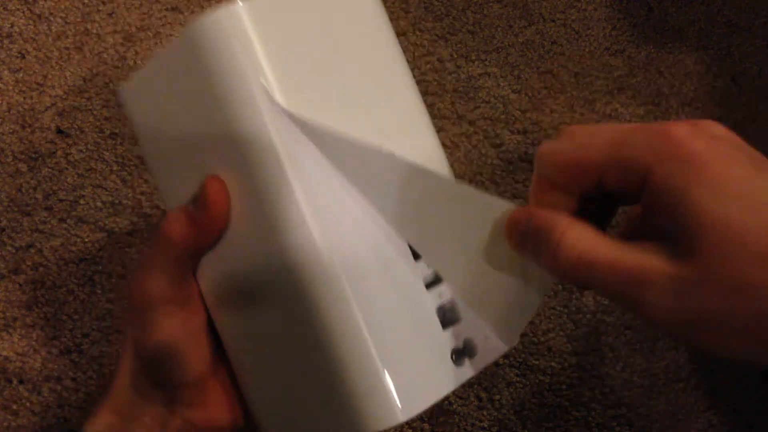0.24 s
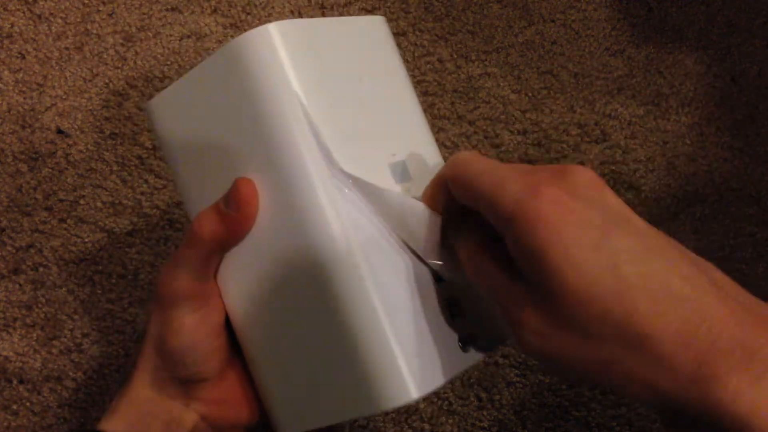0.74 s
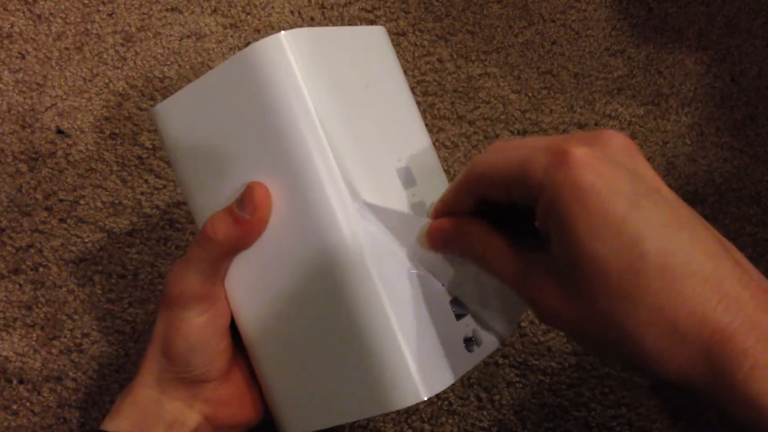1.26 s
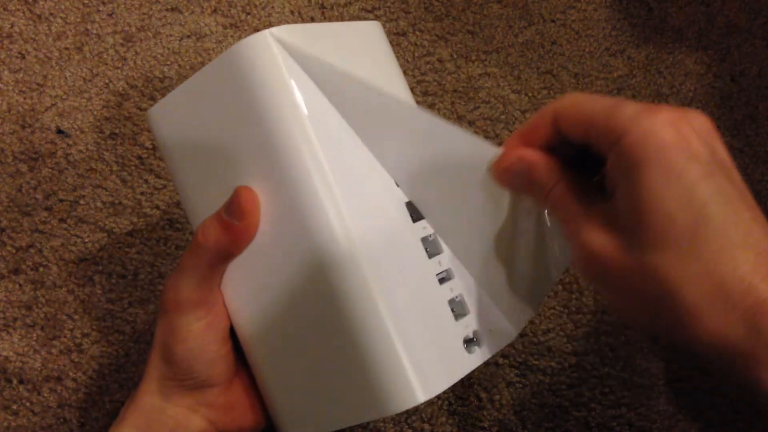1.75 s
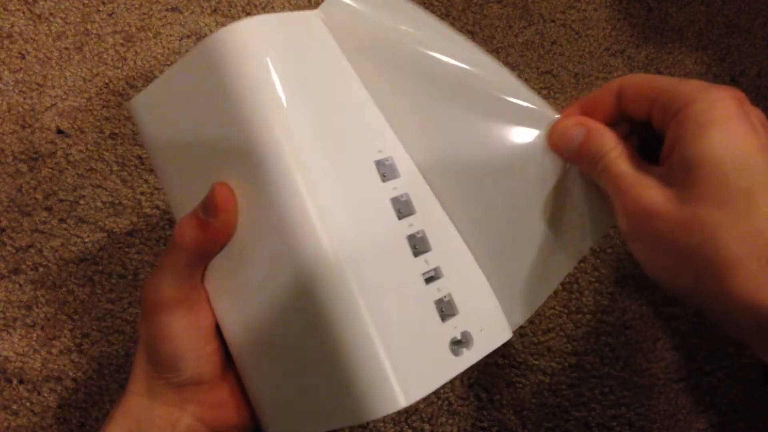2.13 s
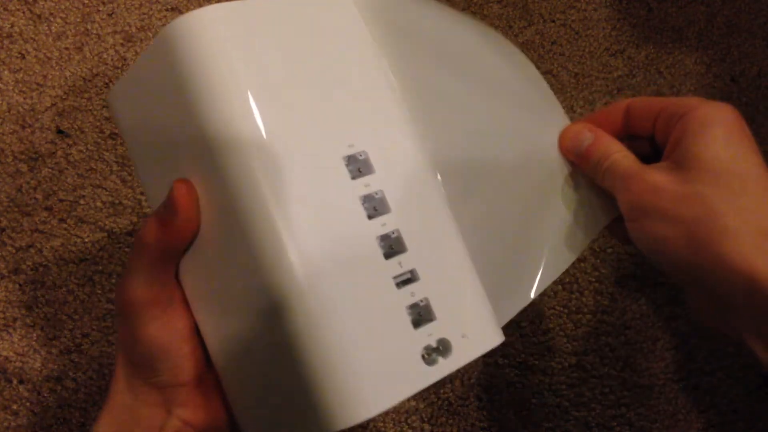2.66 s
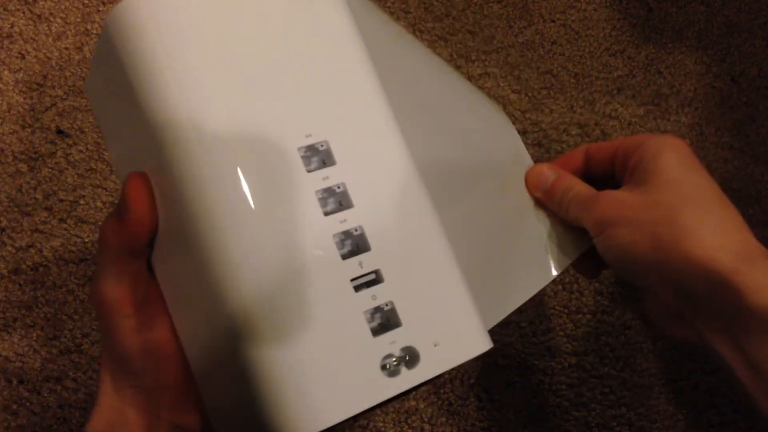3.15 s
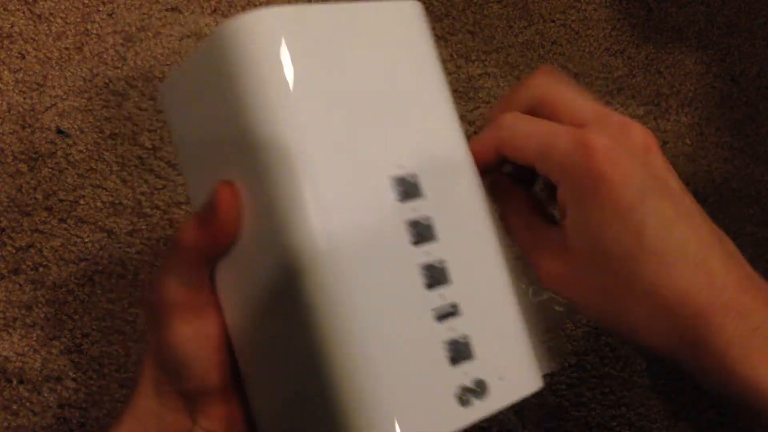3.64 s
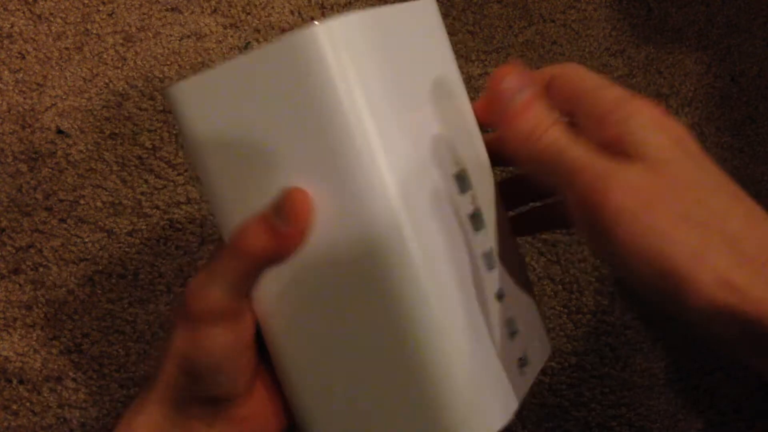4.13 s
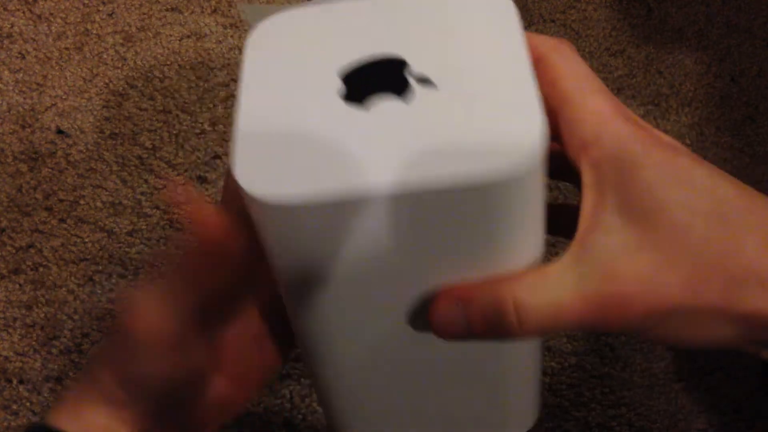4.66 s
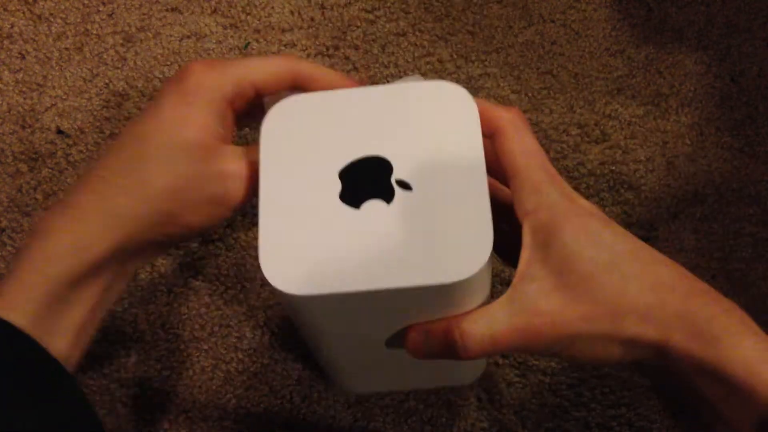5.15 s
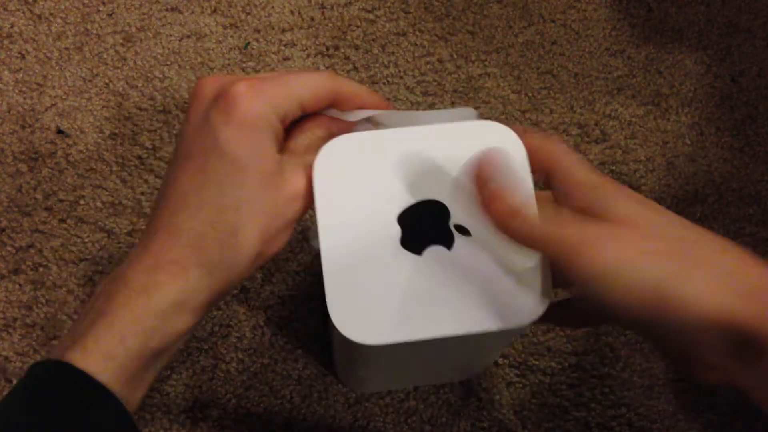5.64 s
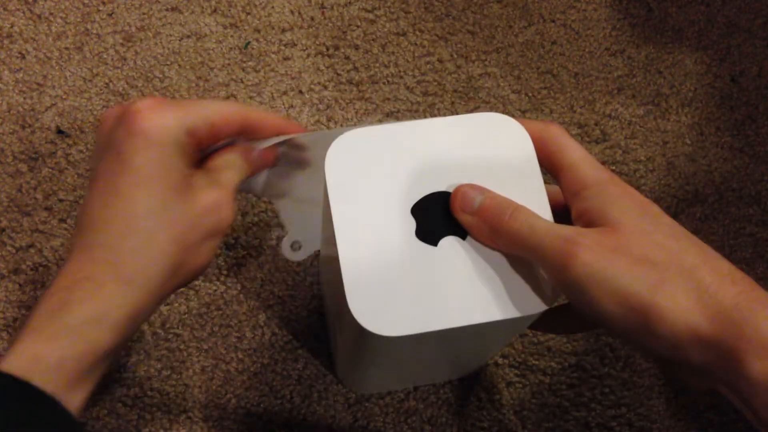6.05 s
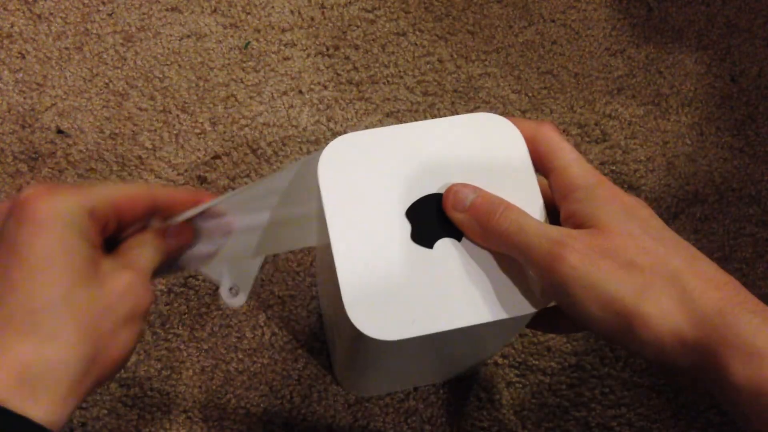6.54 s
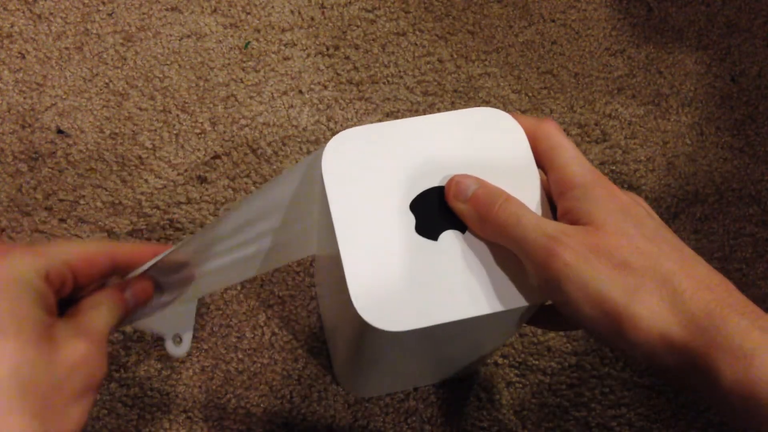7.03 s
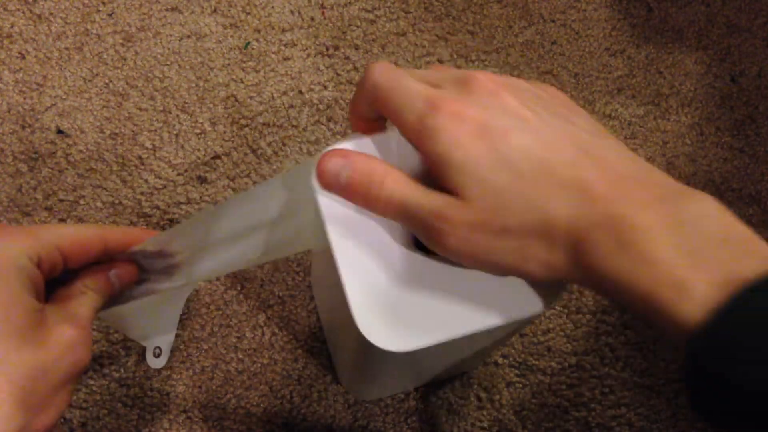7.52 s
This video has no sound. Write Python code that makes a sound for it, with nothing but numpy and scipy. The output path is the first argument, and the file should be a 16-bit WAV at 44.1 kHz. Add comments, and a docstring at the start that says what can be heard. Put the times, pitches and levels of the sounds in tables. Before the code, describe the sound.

Close-up crackling of stiff protective film pulling off a plastic shell in a carpeted room, sparse loud cracks over steady hiss and low rumble.

```python
"""Protective plastic film is peeled by hand off the hollow casing of a small device in a carpeted room.
The sheet cracks as it buckles, crinkles in runs of ticks and pops like a drum skin where it is taut.
Midway it rubs and scrapes over the casing; later the glue lets go in a fine hiss of tiny ticks.
The casing rings along, fingers tick and bump, and behind it all lie room echo, hiss, rumble and hum."""
import sys
import numpy as np
from scipy import signal
from scipy.fft import rfft, irfft, next_fast_len
from scipy.io import wavfile
from scipy.ndimage import map_coordinates

SR = 44100
rng = np.random.default_rng(int(sys.argv[2]) if len(sys.argv) > 2 else 0)


def transcribe(signal):
    """Save signal, clipped to [-1, 1], as a 16-bit WAV file at the path in sys.argv[1]."""
    frames = np.atleast_2d(signal).T
    limited = np.clip(frames, -1, 1)
    pcm = np.round(limited * 32767).astype(np.int16)
    wavfile.write(sys.argv[1], SR, pcm)


N = 343315
TIME = np.arange(N) / SR


def amp(db):
    """Turn decibels into a plain multiplier."""
    return 10 ** (np.asarray(db) / 20)


def unit(x):
    """Scale x to rms 1."""
    return x / np.sqrt(np.mean(x ** 2) + 1e-20)


def unit_energy(x):
    """Scale x to energy 1."""
    return x / np.sqrt(np.sum(x ** 2) + 1e-20)


def along(points, hz):
    """Read a curve of (f/Hz, value) points, spaced as the ear hears pitch (log axis)."""
    f, v = np.transpose(points)
    return np.interp(np.log(hz + 1), np.log(f + 1), v)


def level(rows):
    """Multiplier per sample of a (t/s, level/dB) curve, silent outside it."""
    s, db = np.transpose(rows)
    inside = (TIME >= s[0]) * (TIME <= s[-1])
    return amp(np.interp(TIME, s, db)) * inside


def add(track, s, sound):
    """Mix a sound into the track at time s."""
    part = track[max(round(s * SR), 0):][:len(sound)]
    part += sound[:len(part)]


def filtered(x, gain):
    """Multiply each frequency of x by its own gain."""
    m = next_fast_len(N + SR // 4)  # spare room at the end for ringing
    hz = np.fft.rfftfreq(m, 1 / SR)
    return irfft(rfft(x, m) * gain(hz), m)[:N]


def coloured(x, spectrum):
    """Shape x by a (f/Hz, level/dB) curve, then scale it to rms 1."""
    return unit(filtered(x, lambda hz: amp(along(spectrum, hz))))


def wobble(size, rate):
    """A smooth random curve with that many random points (knots) a second."""
    knots = rng.standard_normal(size // 20)
    return map_coordinates(knots, [np.arange(size) * min(rate, 2000) / SR])


def grains(size, rate, spread_db):
    """Random ticks of uneven strength, about rate a second, at rms 1."""
    unevenness = np.clip(rng.standard_normal(size), -2, 2)
    strength = amp(spread_db * unevenness) * rng.choice([-1, 1], size)
    return unit(strength * (rng.random(size) < rate / SR))


def moves(rows, attack_s, release_s, swell_db_per_s=0):
    """Loudness of (t/s, length/s, level/dB) hand movements: each sets in, holds or swells, and dies away."""
    gain = np.zeros(N)
    for s, length, db in rows:
        t = np.maximum(TIME - s, 0)
        swell_db = swell_db_per_s * np.minimum(t - length, 0)
        fade_db = 60 * np.maximum(t - length, 0) / release_s
        shape_db = np.maximum(swell_db - fade_db, -120)
        gain += amp(db + shape_db) * (1 - np.exp(-t / attack_s))
    return gain


def facet(push, centre_hz, rise_db, fall_db, ring_db, size=8192):
    """A pushed patch of film sounds best around one frequency; energy 1."""
    hz = np.fft.rfftfreq(size, 1 / SR) + 1
    octave = np.log2(hz / centre_hz)
    slopes_db = rise_db * np.minimum(octave, 0) - fall_db * np.maximum(octave, 0)
    db = slopes_db + ring_db * np.exp(-(octave / 0.53) ** 2)
    flip_hz = 13800  # a flip takes a finite time, which dulls the highest treble
    gain = amp(db) / np.sqrt(1 + (hz / flip_hz) ** 20)
    # folding the cepstrum (spectrum of the log gain) makes the patch answer only after the push
    cepstrum = irfft(np.log(np.maximum(gain, 1e-6)))
    cepstrum[1:size // 2] *= 2
    cepstrum[size // 2 + 1:] = 0
    return unit_energy(irfft(rfft(push, size) * np.exp(rfft(cepstrum))))


RISE_DB_PER_OCTAVE = 5.5  # snaps and crinkles weaken this fast below their centre

# single buckles of the film: t/s, level/dB (rms over 10 ms), centre f/Hz, fall above it/dB per octave,
# peak or dip at the centre/dB, share of the first crack in the energy/0-1
BUCKLES = [(0.1973, -45, 3450, 10.5, 0.5, .1), (0.5715, -37, 3070, 8.5, 2.5, 0.63),
           (0.5987, -48, 5170, 17, -2, 0.8), (0.7182, -39, 4470, 8.5, 0.5, 0.3),
           (0.77, -51.5, 2170, 2.5, 9, 0.67), (0.8517, -45, 1940, 5.5, 5, 0.6),
           (1.1105, -49, 5100, 9.5, 1.5, 0.13), (1.17, -62, 1900, 16, -3, .3),
           (1.243, -51.5, 2290, 13.5, -8.5, 0.6), (1.41, -25, 6600, 15, -5, 0.92),
           (1.5156, -45.5, 1850, 9.5, 4, 0.79), (1.9257, -39, 3700, 11, -5.5, 0.58),
           (2.136, -38, 4620, 24, -7.5, 0.5), (2.5173, -22, 5800, 5.5, -1, 0.82),
           (2.8207, -21, 8900, 6.5, -2, 0.76), (2.8738, -44.5, 3700, 8.5, -3, 0.34),
           (3.4117, -48.5, 3630, 13, 8, 0.3), (3.4295, -38, 4970, 16, -5.5, .05),
           (3.464, -42, 5800, 24, -1, .9), (3.977, -41, 1550, 8, 6.5, 0.93),
           (4.6531, -41.5, 6000, 14, 4, 0.4), (4.8947, -28.5, 5470, 15, 5.5, 0.14),
           (4.9172, -36, 5200, 20, 0, 0.35), (4.9504, -41.5, 4810, 24, -4, 0.14),
           (5.0788, -42, 4230, 16, 8, 0.97), (5.373, -59.5, 5000, 20, -4, 0.1),
           (5.4477, -28.5, 12300, 21, 1.5, 0.97), (5.4624, -33.5, 4170, 0.5, 5, 0.13),
           (5.5634, -30, 5240, 2.5, 7.5, 0.53), (5.6048, -37, 6900, 7, 4, 0),
           (5.6364, -39.5, 3960, 12, 6.5, 0), (5.6705, -36.5, 9350, 14, -3.5, 0.4),
           (5.7393, -49.5, 3750, 12, 3, 1), (5.7826, -53.5, 4840, 15, -6, .3),
           (5.9026, -30, 6600, 0, 1, 0.34), (5.9291, -34, 5940, 1, 4, 0.57),
           (5.9437, -35, 3500, 4, 7, 0.04), (6.103, -56, 3500, 1, 6, 0.6),
           (6.2033, -20.5, 8900, 5, 3.5, 0.84), (6.333, -55, 3620, 3, 7, .27),
           (6.4007, -24, 7360, 8, 10, 0.45), (6.4484, -39, 3150, 8.5, -10, 0.87),
           (6.482, -32.5, 9050, 10, 6, 0.3), (6.5241, -40, 7000, -6, 10, 0.45),
           (6.619, -51, 8800, -9, 6, 0.2), (6.812, -54.5, 4000, 15, 3.5, 0.5),
           (7.2347, -39.5, 3630, 9.5, 2.5, 0.52), (7.2959, -53, 6430, 12, 1, 0.87),
           (7.489, -56.5, 4120, 13, 18, 0.5)]


def snaps():
    """A buckle flips with one crack, rebounds within a few milliseconds and leaves the sheet fluttering."""
    track, t = np.zeros(N), np.arange(2048) / SR
    for s, db, centre_hz, fall_db, ring_db, share in BUCKLES:
        share = np.clip(share, 0, 1)
        # both fade by 60 dB: the rebound in 3.5 ms, the flutter in 33 ms
        rebound = unit_energy(rng.standard_normal(len(t)) * amp(-60 * t / .0035) * (t > .0001))
        crack = unit_energy((t == 0) + .7 * rebound)
        flutter = unit_energy(rng.standard_normal(len(t)) * amp(-60 * t / 0.033) * (t > .0001))
        push = np.sqrt(share) * crack + np.sqrt(1 - share) * flutter
        snap = facet(push, centre_hz, RISE_DB_PER_OCTAVE, fall_db, ring_db)
        add(track, s, amp(db) * np.sqrt(SR / 100) * snap)
    return track


def disperse(x):
    """Bending waves run faster the higher they are, so a crack's low part arrives a little later."""
    radian_hz = 40  # the wave lags by one radian here
    return filtered(x, lambda hz: np.exp(-1j * np.sqrt(hz / radian_hz)))


# runs of tiny buckles: t/s, length/s, level/dB (before a 1 dB trim), centre f/Hz,
# fall above it/dB per octave, peak or dip at the centre/dB
CREASES = [(0.577, 0.005, -40, 2980, 15, -7), (0.702, 0.04, -47.5, 6960, 8, -8),
           (0.84, 0.03, -53, 1900, 5.5, -6), (0.881, 0.013, -30, 5800, 21.5, -1),
           (0.904, 0.037, -43.5, 3800, 15, -7.5), (1.082, 0.011, -52.5, 2100, 0.5, 13),
           (3.423, .02, -50, 5430, 12, 5), (3.657, 0.02, -35, 5020, 29.5, -5.5),
           (3.689, 0.026, -39, 4000, 21, -1), (3.999, 0.0413, -45, 4900, 24, 1),
           (4.046, 0.022, -40.5, 4520, 20, 1.5), (4.654, .055, -52.5, 4730, 13.5, -7.5),
           (5.005, .009, -50, 2100, 4, 3), (5.022, 0.018, -42, 4960, 18.5, -0.5),
           (5.058, .024, -41, 4300, 18.5, -3.5), (5.26, .022, -51.5, 4400, 7, -1),
           (5.289, 0.013, -37.5, 4700, 13, 3), (5.31, 0.0076, -47.5, 4330, 21, 2),
           (5.941, .037, -47, 4400, 13, -3), (6.408, 0.038, -39, 7400, 9, 18),
           (6.489, 0.035, -48.5, 9710, 15, 8), (7.49, 0.022, -57.5, 3650, 7, -1),
           (7.588, 0.013, -60, 1800, 5.5, -1)]


def crinkles():
    """A crease runs through the film as a short avalanche of ticks, which come in clumps."""
    track, t = np.zeros(N), np.arange(4096) / SR
    for s, length, db, centre_hz, fall_db, ring_db in CREASES:
        swell = (1 - np.exp(-t / 0.0018)) * amp(-60 * np.maximum(t - length, 0) / 0.021)
        clumps = amp(2.6 * wobble(len(t), rate=355))
        ticks = grains(len(t), rate=1300, spread_db=-1.0)
        push = swell * clumps * (ticks + 0.85 * rng.standard_normal(len(t)))
        crinkle = facet(push, centre_hz, RISE_DB_PER_OCTAVE, fall_db, ring_db)
        add(track, s, amp(db - 1.0) * np.sqrt(length * SR) * crinkle)
    return track


# pops of the taut film and of fingers on the casing: t/s, level/dB (lowest tone, before its soft start),
# pitch f/Hz, time to fade by 60 dB/s (lowest tone), level added to all overtones/dB
SKIN_POPS = [(0.197, -36.5, 304, .085, -10), (0.886, -36.5, 121, 0.029, -9), (0.892, -37, 244, 0.023, -15),
             (0.922, -50.5, 171, 0.11, -14), (1.407, -20.5, 989, 0.02, 0), (1.41, -44.5, 500, 0.085, -21),
             (1.515, -38.5, 530, 0.03, -23), (1.926, -51, 340, .046, -22), (2.136, -47.5, 364, 0.14, -7),
             (2.517, -41.5, 207.6, 0.2, -11.5), (2.877, -55, 392, 0.18, 0),
             (3.109, -57, 148.5, 0.077, -0.5), (3.669, -35.5, 424, .049, -24),
             (3.977, -39.5, 544, 0.03, -20), (5.7375, -41.5, 252, .054, 2.5), (5.949, -46, 165, 0.096, -20),
             (6.2034, -39, 592, 0.027, -15)]
# overtones of a pop: multiple of its pitch, level/dB
SKIN_OVERTONES = [(1.67, -2.5), (2.58, -2), (3.75, -1), (5.35, -4.5)]
SKIN_DAMPING = 0.23  # fading time shortens as this power of the multiple


def pops():
    """Each pop rings like a drum skin at a pitch set by the film's tension, which trembles as it rings."""
    track, t = np.zeros(N), np.arange(SR // 4) / SR
    for s, db, hz, t60, overtones_db in SKIN_POPS:
        overtones = [(multiple, mode_db + overtones_db) for multiple, mode_db in SKIN_OVERTONES]
        for multiple, mode_db in [(1, 0.0049)] + overtones:
            phase = 2 * np.pi * hz * multiple * t + 0.85 * wobble(len(t), rate=130)
            fade_db = 60 * t / t60 * multiple ** SKIN_DAMPING
            soft_start = 1 - np.exp(-t / 0.0013)
            add(track, s, amp(db + mode_db - fade_db) * soft_start * np.sin(phase))
    return track


# strokes of film and hands over the casing: t/s, length/s, level at the end/dB (before a 4 dB trim)
RUB_STROKES = [(3.41, 0.047, -44.5), (3.573, 0.0075, -52), (3.62, 0.1, -43), (3.77, 0.034, -51.5),
               (3.835, 0.057, -50.5), (3.912, 0.15, -44), (4.14, 0.02, -54.5), (4.195, 0.043, -62.5),
               (4.303, 0.017, -56), (4.352, 0.031, -55.5), (4.42, .055, -61.5), (4.54, 0.037, -57.5),
               (4.66, 0.063, -53), (4.91, 0.05, -57), (5.0, 0.11, -56), (5.165, 0.018, -58.5),
               (5.27, 0.033, -62), (5.56, 0.11, -58), (7.44, 0.073, -62), (7.575, 0.024, -70)]
# tone of the rubbing, only the shape counts: f/Hz, level/dB
RUB_COLOUR = [(120, -59), (200, -9), (262, -10), (397, -3.5), (683, -11.5), (1540, -1.5), (2800, -4),
              (4310, -4), (5550, -12.5), (8880, -22), (15000, -33)]
PRESS_DB_PER_S = 28  # a stroke presses harder as it goes on


def slide():
    """Dull dry friction, with small catches where the film sticks."""
    kicks = np.abs(grains(N, rate=250, spread_db=6.5))
    catches = signal.lfilter([1], [1, -np.exp(-1 / (0.0063 * SR))], kicks)  # each kick dies away
    rub = grains(N, rate=6000, spread_db=5.5) * (0.55 + unit(catches))
    strokes = moves(RUB_STROKES, attack_s=0.0051, release_s=0.16, swell_db_per_s=PRESS_DB_PER_S)
    pressure = strokes * amp(0.7 * wobble(N, rate=100))
    return amp(-4.0) * pressure * coloured(rub, RUB_COLOUR)


# the sheet's edge scraping along the casing, with its wandering resonance: t/s, level/dB, f/Hz
EDGE_SCRAPE = [(3.42, -67, 1396), (3.53, -62.5, 1338), (3.57, -74.5, 1360), (3.701, -48, 1900),
               (3.791, -77, 1994), (3.86, -50, 1855), (3.9, -65, 1600), (3.923, -50.5, 1462),
               (3.965, -58, 1538), (4.04, -64, 1540), (4.099, -85, 1350)]


def scrape():
    """Friction drives one resonance of the sheet, which shifts as the sheet bends."""
    s, db, hz = np.transpose(EDGE_SCRAPE)
    phase = 2 * np.pi * np.cumsum(np.interp(TIME, s, hz)) / SR
    half_width_hz = 380  # the noise is halved this far from the resonance
    lowpass = lambda f: 1 / (1 + (f / half_width_hz) ** 2)
    drive = [filtered(rng.standard_normal(N), lowpass) for _ in range(2)]
    resonance = unit(drive[0] * np.cos(phase) + drive[1] * np.sin(phase))
    return level(np.transpose([s, db])) * resonance


# pulls that make the glue line let go: t/s, length/s, level/dB
GLUE_PULLS = [(4.78, 0.031, -59.5), (5.15, 0.17, -63), (5.42, 0.51, -67), (5.98, 0.14, -61),
              (6.13, 0.12, -55.5), (6.45, 0.23, -60), (6.7, .43, -59.5)]
# tone of the parting glue, only the shape counts: f/Hz, level/dB
GLUE_COLOUR = [(290, -51.5), (500, -38), (576, -17.5), (871, -11.5), (1140, -2), (2070, 0.5), (2720, -3),
               (3410, 3), (4670, 5), (7790, 4.5), (15000, -6.5)]


def peel():
    """Thousands of glue threads part each second along the peeling edge, which advances a little unevenly."""
    unevenness = amp(1.2 * wobble(N, rate=90))
    pull = moves(GLUE_PULLS, attack_s=0.02, release_s=.42)
    threads = grains(N, rate=5000, spread_db=0)
    return pull * unevenness * coloured(threads, GLUE_COLOUR)


# spells of the fingers working the film and shifting their grip: t/s, length/s,
# film ticks level/dB (before a 5.5 dB trim), shell bumps level/dB
FINGER_SPELLS = [(0.363, .03, -59, -82), (0.575, .13, -61, -68.5), (0.92, .2, -66, -82),
                 (1.33, 0.11, -64.5, -69), (4.53, .19, -60, -72), (4.889, .2, -57, -66.5),
                 (5.26, .05, -56.5, -64), (5.44, 0.37, -57.5, -71.5), (5.83, .14, -62, -77),
                 (6.08, .12, -66, -77), (6.38, .15, -63, -64), (6.85, .25, -65, -80.5),
                 (7.431, .33, -69, -81)]


def fidget():
    """Stray tiny buckles at uneven intervals, each from a patch of another size."""
    track, t = np.zeros(N), np.arange(1024) / SR
    count = 280
    for k, (delay, size, strength) in enumerate(rng.random((count, 3))):
        push = rng.standard_normal(len(t)) * amp(-60 * t / 0.074)
        tick = facet(push, 1500 * 5.1 ** size, rise_db=1.5, fall_db=8, ring_db=10)
        add(track, (k + delay) * N / SR / count, amp(8 * strength) * tick)
    spells = [(s, length, db) for s, length, db, _ in FINGER_SPELLS]
    working = moves(spells, attack_s=0.038, release_s=0.49)
    return amp(-5.5) * working * unit(track)


# tone of the bumps, only the shape counts: f/Hz, level/dB
BUMP_COLOUR = [(30, -27), (80, 0), (150, -3), (290, -4), (450, -12.5), (1200, -46)]


def grip():
    """Soft fingers make the shell rumble in small dull bumps."""
    spells = [(s, length, db) for s, length, _, db in FINGER_SPELLS]
    shifting = moves(spells, attack_s=0.0082, release_s=0.38)
    bumps = grains(N, rate=180, spread_db=5)
    return shifting * coloured(bumps, BUMP_COLOUR)


# resonances of the hollow casing: f/Hz, width/Hz, level against the direct sound/dB
SHELL_MODES = [(1530, 28, -7.5), (1724, 20, -9.5), (2530, 38, -5.5), (3050, 15, -9.5), (3650, 63, -4.5),
               (3950, 100, -5), (4800, 18, -12.5), (5375, 70, -19)]


def casing(x):
    """The film is stuck to the shell and sets its modes (natural tones) ringing briefly."""
    def shell(f):
        return sum(amp(db) * f * width / (hz * hz - f * f + 1j * f * width)
                   for hz, width, db in SHELL_MODES)
    return filtered(x, shell)


# how long the room rings: f/Hz, time to fade by 60 dB/s
ROOM_FADE = [(200, .16), (1000, 0.13), (4000, 0.14), (8000, 0.14), (15000, 0.044)]


def room(x):
    """A short soft tail, with one clearer echo from the nearest wall."""
    hz, t, z = signal.stft(rng.standard_normal(SR // 3), SR, nperseg=256)
    fade = amp(-60 * t / along(ROOM_FADE, hz)[:, None])
    tail = unit_energy(signal.istft(z * fade, SR, nperseg=256)[1])
    answer = np.zeros(SR // 2)
    add(answer, .004, amp(-14.5) * tail)
    t = np.arange(SR // 50) / SR
    echo = unit_energy(rng.standard_normal(len(t)) * amp(-60 * t / 0.011))
    add(answer, .0175, amp(-25.0) * echo)
    return signal.fftconvolve(x, answer)[:N]


# tone of the hiss, only the shape counts: f/Hz, level/dB
STEADY_HISS = [(240, -29.5), (400, -5), (438, -6), (535, -2), (663, -7.5), (914, -11.5), (1420, -11),
               (2030, -11.5), (3510, -8), (14600, -10.5), (15500, -12)]
# tone of the rumble, only the shape counts: f/Hz, level/dB
HOUSE_RUMBLE = [(15, -54), (25, -29.5), (36, -8), (54, -1), (70, -1.5), (86, -0.5), (118, 1.5), (277, -4),
                (500, -14), (650, -43), (1100, -120)]
# mains hum: f/Hz, level against the hiss/dB
MAINS_HUM = [(59.5, -10), (178, -25.5)]
HISS_DB = -67.5


def background():
    """Even hiss, the low rumble of the house and a faint mains hum."""
    hiss = coloured(rng.standard_normal(N), STEADY_HISS)
    rumble = amp(-5.5) * coloured(rng.standard_normal(N), HOUSE_RUMBLE)
    hum = sum(amp(db) * np.sqrt(2) * np.sin(2 * np.pi * (hz * TIME + rng.random()))
              for hz, db in MAINS_HUM)
    return amp(HISS_DB) * (hiss + rumble + hum)


def scene():
    """The film close by, on its casing, in its room."""
    film = disperse(snaps()) + crinkles() + fidget() + slide() + scrape() + peel()
    near = film + casing(film) + pops() + grip()
    return (near + room(near) + background())[None]


OVERLOAD_DB = -24.5  # treble level that sets off the gain control
# fastest fall, and the steady return that also works against it
DUCK_DB_PER_S, RECOVER_DB_PER_S = 240, 1.2


def gain_control(x):
    """While the treble is too loud the gain falls; afterwards it creeps back."""
    window = SR // 100  # 10 ms
    treble = filtered(x, lambda hz: hz > 4000)
    power = np.abs(signal.fftconvolve(treble ** 2, np.ones(window) / window)[:N])
    overload = np.clip(10 * np.log10(power + 1e-20) - OVERLOAD_DB, 0, 1)
    drift_db = np.cumsum(DUCK_DB_PER_S * overload - RECOVER_DB_PER_S) / SR
    gain_db = np.minimum.accumulate(drift_db) - drift_db  # never above 0 dB
    return x * amp(gain_db)


TOP_HZ = 15400  # the recorder's band limit


def record(dry):
    """The small microphone loses deep bass; the recorder ducks loud treble, rounds peaks and cuts the top."""
    bass = lambda hz: hz / np.sqrt(hz ** 2 + 55 ** 2)
    band = lambda hz: 1 / np.sqrt(1 + (hz / TOP_HZ) ** 200)
    sound = gain_control(filtered(dry[0], bass))
    rounded = sound / (1 + (sound / .72) ** 4) ** .25  # peaks bend towards 0.72
    return filtered(rounded, band)[None]


dry = scene()
out = record(dry)
transcribe(out)
```